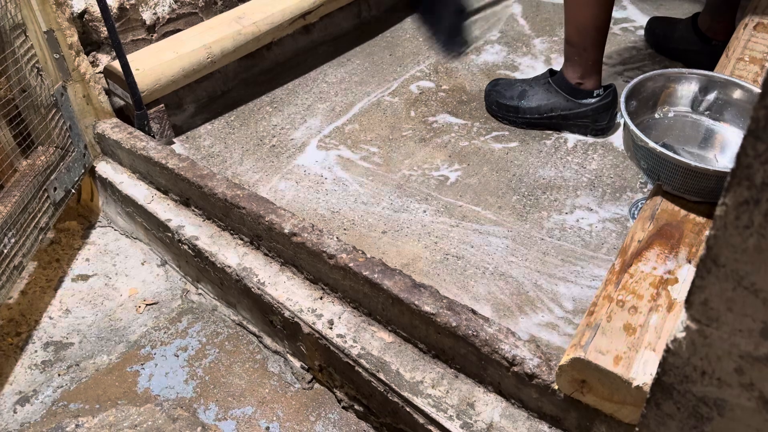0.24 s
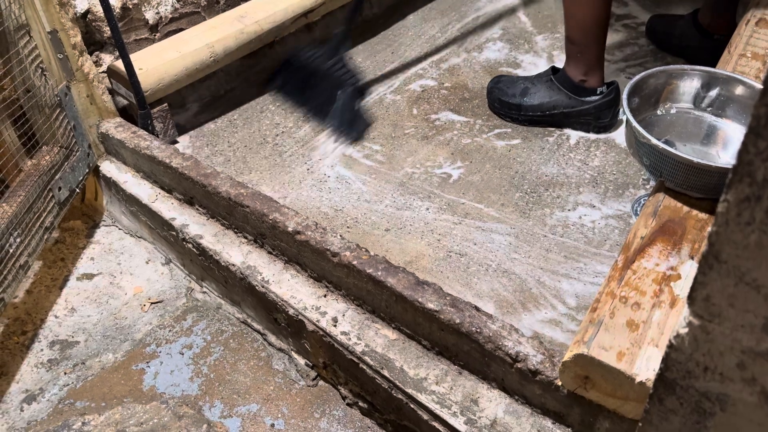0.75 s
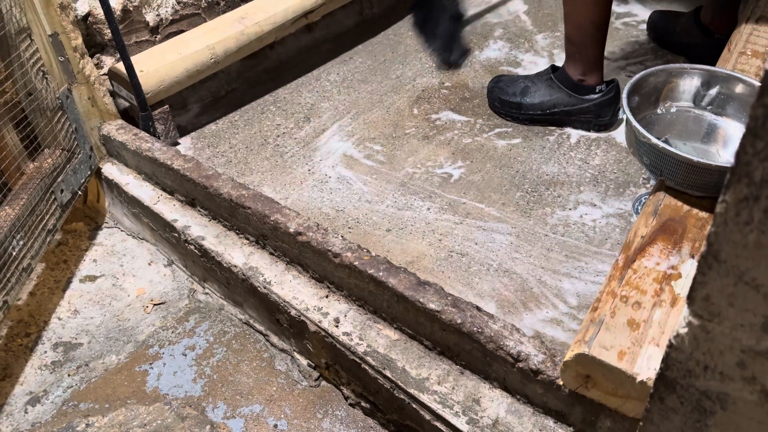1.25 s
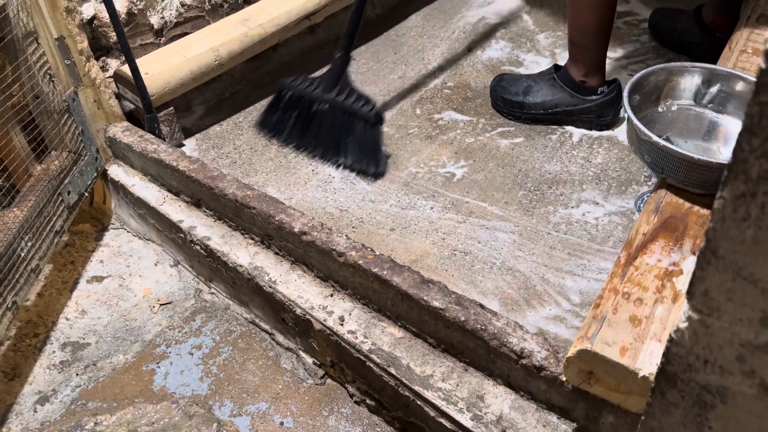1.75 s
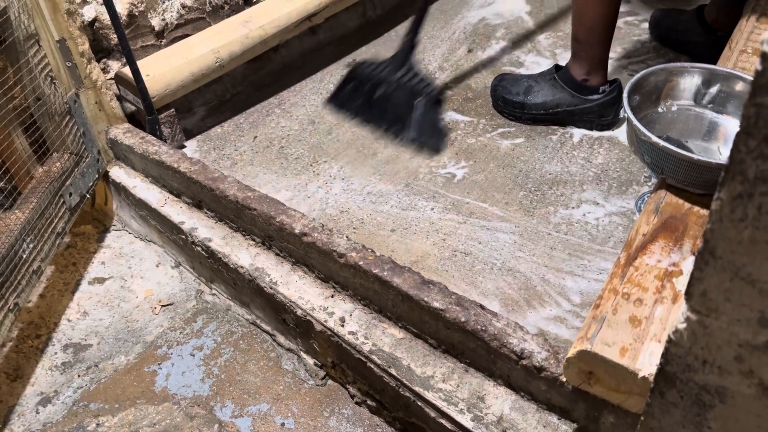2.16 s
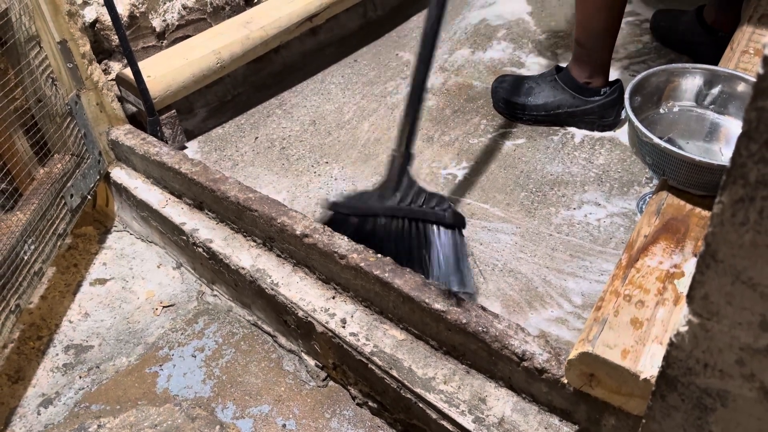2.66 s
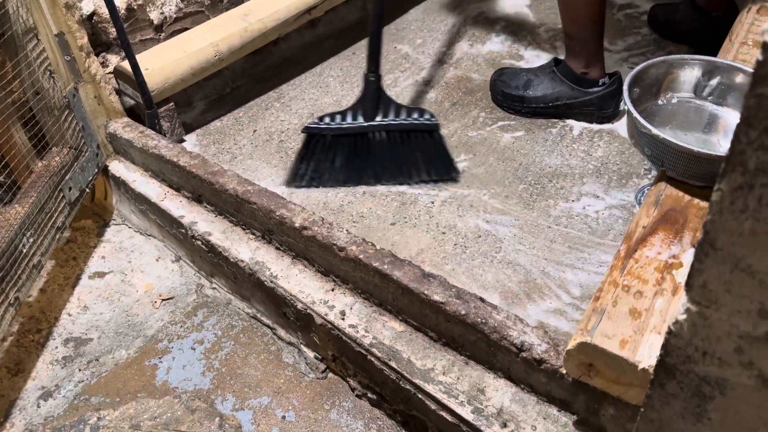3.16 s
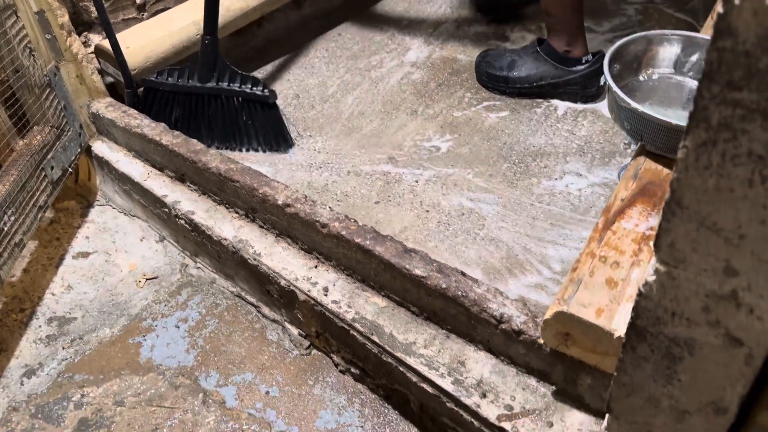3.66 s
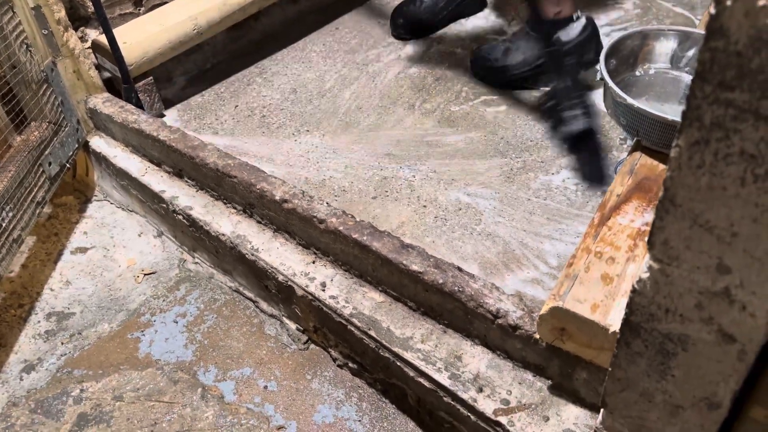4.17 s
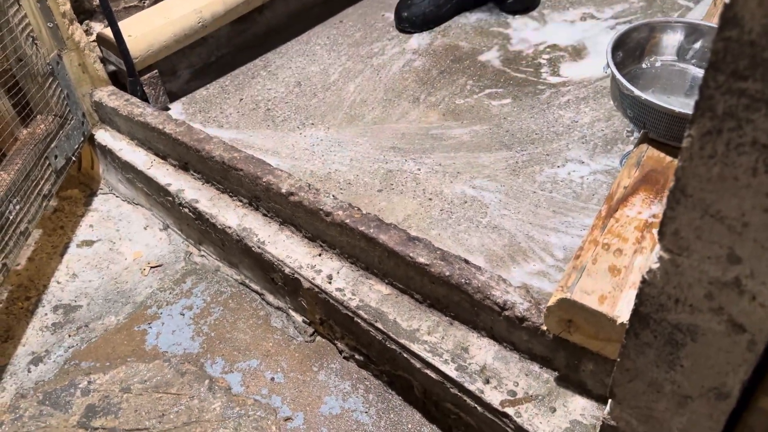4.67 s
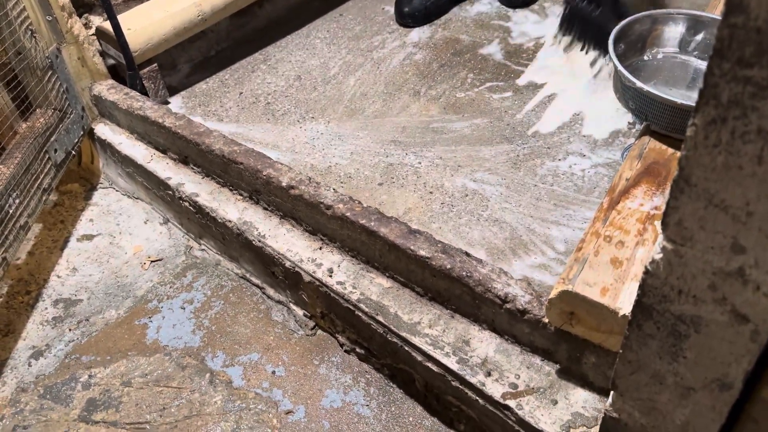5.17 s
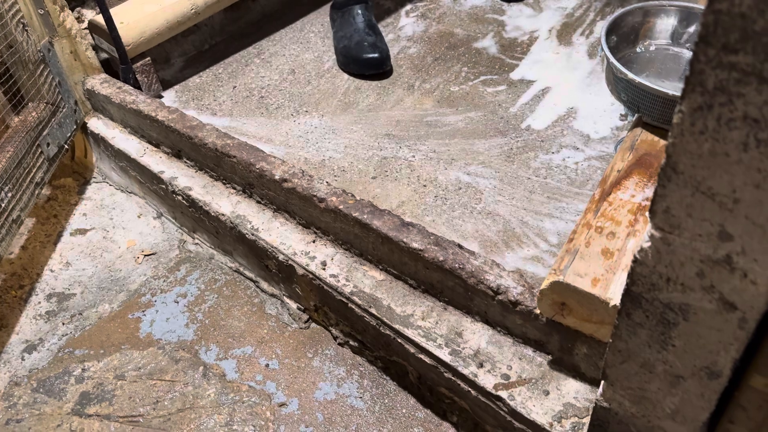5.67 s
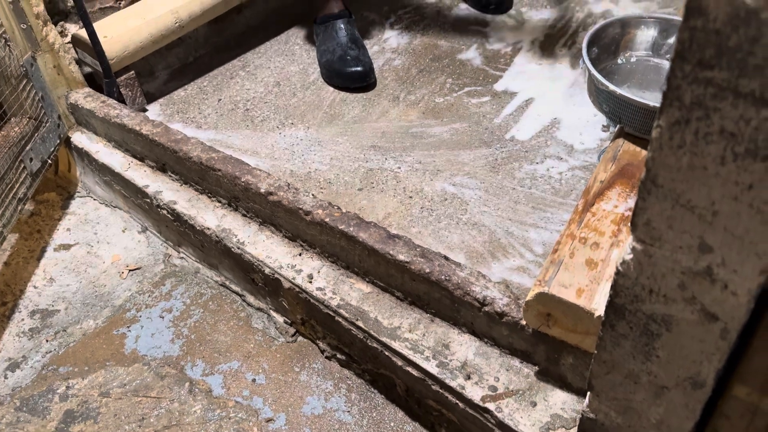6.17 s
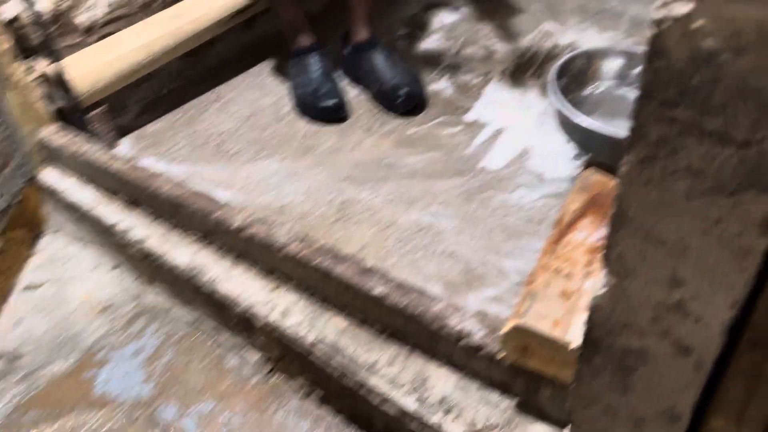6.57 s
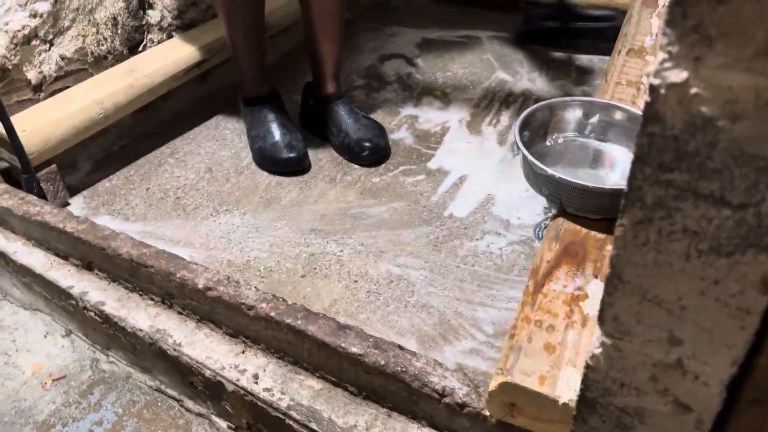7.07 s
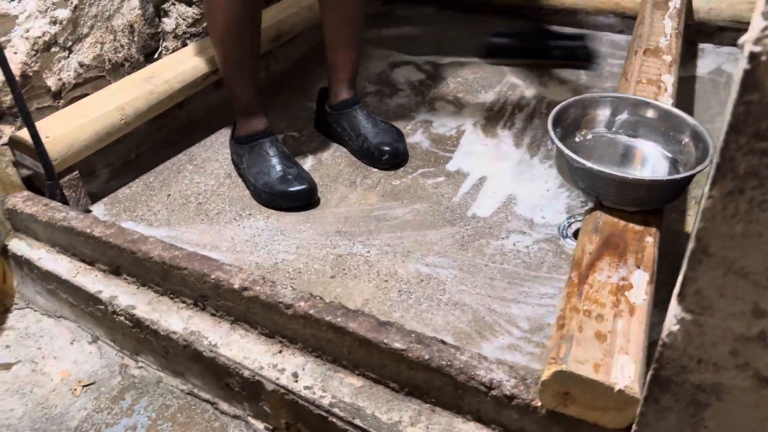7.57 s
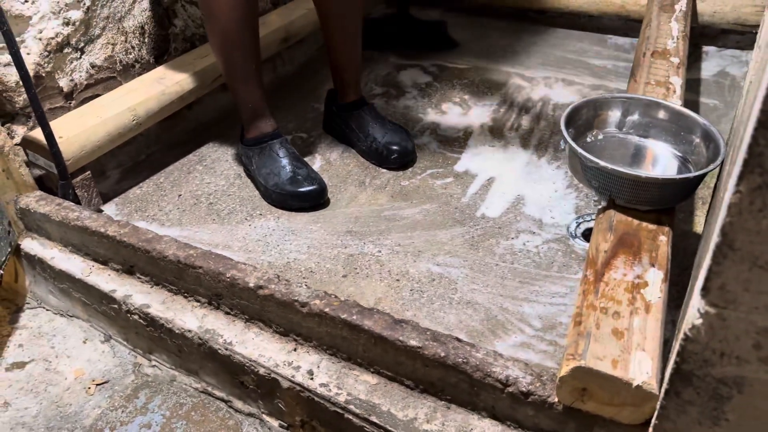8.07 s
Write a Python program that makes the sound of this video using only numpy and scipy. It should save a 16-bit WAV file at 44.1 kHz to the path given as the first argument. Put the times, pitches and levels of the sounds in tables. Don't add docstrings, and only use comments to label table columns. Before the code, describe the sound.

Brisk, bristly scrubbing on a sudsy floor, with sloshing water, hollow wood knocks growing busier later, and a tiny drain gulp near the end.

```python
import sys
import numpy as np
from scipy import signal
from scipy.fft import rfft, irfft, next_fast_len
from scipy.io import wavfile

SR = 44100
rng = np.random.default_rng(int(sys.argv[2]) if len(sys.argv) > 2 else 0)


def to_wav(sig):
    pcm = np.clip(np.atleast_2d(sig), -1, 1) * 32767
    pcm = np.round(pcm).astype(np.int16)
    wavfile.write(sys.argv[1], SR, pcm.T)


def to_linear_factor(level_db):
    exponent = np.asarray(level_db, float) / 20
    return 10 ** exponent


N = 366912
HZ = np.maximum(np.fft.rfftfreq(N, 1 / SR), 1)
FAR_FROM_S = 4

# start in seconds, speeding up in seconds,
# slowing down in seconds, bristle hiss at full speed in dB, wetness as slosh in dB against the hiss.
STROKES = [(-0.19, 0.044, 0.31, -32, 0.5), (0.064, 0.28, 0.44, -18.5, -10.5),
           (0.51, 0.035, 0.046, -33.5, -2.5), (0.535, 0.36, 0.22, -19.5, -5.5),
           (0.927, 0.083, 0.098, -26, -5), (1.097, 0.16, 0.54, -19, -12.5),
           (1.324, 0.054, 0.03, -25.6, -15), (1.349, 0.44, 0.14, -27.5, -13.5),
           (1.55, 0.035, 0.089, -28.5, -10), (1.948, 0.076, 0.11, -45.5, -28),
           (2.036, 0.087, 0.17, -23, -6.5), (2.15, 0.075, 0.2, -20.5, -5.5),
           (2.398, 0.17, 0.3, -26, -13), (2.445, 0.014, 0.053, -33.5, -6),
           (2.616, 0.046, 0.1, -32, -2), (2.618, 0.2, 0.26, -30.5, -7), (3.041, 0.11, 0.33, -32, -6),
           (3.191, 0.34, 0.13, -27, -10), (3.352, 0.068, 0.092, -35, -15),
           (3.685, 0.21, 0.89, -25, -11), (3.939, 0.27, 0.38, -24.5, -11.5),
           (3.945, 0.12, 0.23, -23, -9), (4.18, 0.13, 0.072, -31.5, -3.5),
           (4.32, 0.088, 0.38, -24, -13.5), (4.672, 0.32, 0.26, -25, -4.5), (4.9, 0.13, 0.14, -37, 3.5),
               (5.127, 0.26, 0.2, -25.5, -13), (5.182, 0.1, 0.22, -20, -11), (5.374, 0.046, 0.13, -32, -3),
               (5.546, 0.25, 0.2, -25.5, -5), (5.947, 0.26, 0.083, -30, -21),
               (6.031, 0.044, 0.061, -30, -6), (6.075, 0.15, 0.2, -28, -4.5), (6.21, 0.18, 0.21, -34.5, -4),
               (6.504, 0.21, 0.35, -30, -3), (6.758, 0.12, 0.094, -27.5, -8.5),
               (6.963, 0.23, 0.21, -22.5, -8.5), (7.235, 0.069, 0.11, -27.5, -8.5),
               (7.337, 0.19, 0.41, -23.5, -4), (7.57, 0.054, 0.18, -29.5, -14),
               (7.752, 0.23, 0.24, -19.5, -9), (7.99, 0.056, 0.03, -27, -12), (8.102, 0.23, 0.063, -23, -4)]
# level in dB against the hiss, dB gained per dB of wetness,
# power of the speed, dB gained along a stroke, level at rest in dB.
LAYERS = [
    (-11.5, 1.62, 1.8, 0, -54.5),
    (-1.96, 1.62, 1.94, 2, -68),
    (-1.56, 1.03, 1.83, 3.5, -59.5),
    (-0.04, 0.0034, 2.02, 3.5, -52),
    (-11, -0.44, 1.94, -0.5, -64),
]
LAYER_EDGES_HZ = [1093, 1943, 3316, 9150]
# time in seconds, lift in dB.
SUDS = [(0.0, -1), (.9, -0.5), (1.3, -5.5), (1.9, 4), (2.2, -3), (2.62, 3), (3.0, -1.5), (4.0, -1.7),
        (4.35, 1), (5.0, 2.5), (5.6, -0.5), (6.1, 2), (6.4, -1), (6.8, 2.5), (7.3, -1), (8.32, 0)]
# lightest moment in seconds,
# lifting in seconds, settling in seconds, loss in dB (below 0 is a last press).
HOPS = [
    (.49, 0.016, 0.092, 4.5),
    (.595, 0.031, 0.021, 9),
    (1.09, 0.02, 0.021, -7),
    (1.93, 0.04, 0.033, -11),
    (2.052, 0.034, 0.0059, 7),
    (2.4505, 0.018, .003, 6),
    (5.2, 0.02, 0.013, 0),
    (5.997, 0.023, .002, 5),
    (6.045, 0.02, .006, -1),
    (7.78, 0.028, 0.016, 7),
]
# pitch in Hz, left level in dB, right level in dB,
# likeness of the ports from 0 to 1.
PORTS = [(238, -30.5, -28.5, 1), (600, -20, -18.5, 0.39), (1150, -12.5, -12, 0.54), (1400, -10, -8, 0.6),
         (3240, -3.5, -4, 0.24), (4650, 5.5, -2, 0.3), (5250, 2.5, -1, 0.2), (6050, 6.5, -.5, 0.35),
         (6600, 4.5, -1, 0.3), (7500, 4, .5, 0.4), (8700, 0.5, 3.5, 0.64), (9400, -.5, 0, .99),
         (10000, -3, -3, 0.99), (10300, -5, -5, 0.98), (16000, -3.5, -5, 0.91)]
# time in seconds, left over right in dB.
BROOM_SIDE = [(0.0, 5), (1.27, 4), (1.81, 5), (2.8, 4), (3.89, 4.5), (4.9, 5), (6.19, 6), (6.6, 5.5),
              (7.34, 5), (7.44, 4), (7.67, 4.5), (8.32, 3.5)]
# time in seconds,
# duration in seconds, pitch in Hz, width in octaves, change in dB.
BAND_SWELLS = [(0.15, 0.061, 2400, 1.5, 4), (.47, 0.17, 2560, 1.9, -4.5), (.47, 0.079, 850, 0.65, 6),
               (.65, 0.043, 5100, 2.2, 4.5), (0.657, 0.052, 1103, 0.55, 1), (0.777, 0.09, 3100, 0.3, -1),
               (0.994, 0.13, 1700, 0.55, 3), (1.3, .12, 4240, .4, 2), (1.805, 0.16, 1460, 2.04, 7.5),
               (1.868, 0.037, 2810, 2.5, 8.5), (2.05, .04, 2300, 1.1, -9), (2.238, 0.057, 1600, .9, 1.5),
               (2.4, 0.092, 2300, .4, -3), (2.562, 0.068, 1190, 1.5, 11), (2.785, 0.054, 2440, 0.63, 6.5),
               (2.832, .07, 850, .5, 6.5), (3.035, .05, 1100, 1, -9), (3.4, .2, 900, 0.91, 4),
               (3.777, .08, 1280, .5, 4), (3.85, 0.071, 3020, .3, -1), (4.15, .2, 1310, 0.29, -6.5),
               (4.3, .08, 4330, .6, -1.5), (4.604, 0.074, 1480, 1.25, 12), (4.75, .04, 1200, 1.3, -6),
               (4.953, 0.054, 1900, .5, -1), (5.027, 0.033, 1550, 0.26, 5.5), (5.117, 0.095, 960, 0.65, 6.5),
               (5.143, .04, 5000, 1.1, -1), (5.297, 0.12, 2000, .5, -3.5), (5.517, 0.086, 5000, 1.2, -1.5),
               (5.947, .12, 2300, 0.77, -0.5), (6.392, 0.087, 845, .4, 9), (6.55, 0.07, 1310, 0.33, 6),
               (6.794, 0.062, 1400, 1.4, -5), (7.0, 0.098, 1600, 1.5, 5), (7.253, 0.12, 907, 0.49, -8),
               (7.5, 0.17, 1900, 0.46, -1), (7.7, 0.087, 850, 0.37, 6.5), (7.85, 0.056, 2300, 0.62, 2),
               (8.24, 0.074, 4280, 0.32, 4),
               (1.912, 0.072, 9200, 1.89, 10), (1.95, 0.063, 880, 0.68, -18), (3.02, .06, 710, .6, -12),
            (3.62, 0.025, 2100, 1.5, 3), (3.72, 0.024, 3300, 1.4, -2), (8.28, 0.042, 1800, .5, 1.5),
            (5.75, 0.045, 2500, 0.7, 1.5), (5.85, 0.049, 1500, .8, -2), (4.87, .04, 2800, .4, 4),
            (4.2, 0.1, 5800, 0.55, -2), (0.86, 0.09, 4300, .4, 2), (0.33, .1, 4200, .4, 1),
            (6.9, 0.051, 1240, .4, 6), (2.02, 0.066, 3000, .3, -2), (4.43, .04, 2950, .2, 1),
            (0.526, .04, 960, 0.89, 9), (0.86, 0.12, 560, 0.45, -7), (6.2, .1, 640, .5, 3),
            (1.5, 0.22, 1100, .3, 5), (4.3, .04, 1060, 0.22, 11), (7.5, .03, 1600, 0.18, 3.5),
            (7.08, .03, 1950, .2, 7), (4.06, .05, 4400, .2, 4.5), (6.2, 0.072, 6000, 0.88, 2),
            (0.47, .05, 380, .7, 10), (2.22, 0.053, 2200, .4, 1.5), (8.2, 0.055, 4200, .25, 3),
            (7.55, 0.045, 1400, 0.62, 5), (.675, .015, 1430, .2, 11), (3.635, .03, 1500, .9, 10),
            (4.1, .03, 3500, 1.2, -4), (3.71, 0.023, 5200, 1, 3), (0.99, .05, 1500, .4, 2),
            (8.3, 0.027, 1380, 0.21, 9.5), (2.22, .06, 3000, .5, 1.5), (1.12, .03, 1000, 1.5, -5),
            (5.33, 0.037, 6800, 0.82, 2), (0.91, .03, 1400, .25, 4), (7.42, .03, 3300, 1, 4.5)]
# pitch in Hz, level in dB per Hz.
RUMBLE = [(15, -38), (25, -46), (46, -10), (64, 9), (295, -0.5), (444, -0.5), (501, 5), (626, -25),
          (1010, -5.5), (1200, -27), (1500, -3.5), (1950, -2), (3300, -120)]
# time in seconds, level in dB.
JOLTS = [(0.0, -40), (.2, -47), (.53, -48), (2.9, -54), (3.15, -46), (3.61, -46), (4.61, -49), (5.21, -69),
         (5.44, -48), (5.93, -63), (6.21, -53), (6.93, -59), (7.39, -50), (7.71, -52), (8.0, -62)]
# time in seconds, peak in dB.
SCUFFS = [(.001, -25), (.03, -28.5), (.12, -30), (.5, -26), (3.85, -33), (6.6, -36), (.8, -25),
          (1.044, -30), (1.912, -31), (2.2, -33), (2.47, -31), (2.545, -29), (2.652, -27.5), (4.3, -34),
          (6.06, -29), (7.31, -21.5), (7.75, -25)]
# time in seconds, peak in dB, thud pitch in Hz,
# ring in dB against the thud, lowest mode in dB against the thud.
NEAR_KNOCKS = [
    (0.002, -25, 486, -7, -7),
    (0.029, -30.5, 425, 0, -18),
    (0.4995, -18.5, 1350, -2, -30),
    (0.534, -34, 447, 0, -18),
    (2.632, -21, 1190, -4, -25),
    (3.558, -14, 530, -2, -20),
    (3.563, -4.5, 398, -12, -28),
]
FAR_KNOCKS = [(4.574, -30.5, 564, -3, -13), (4.625, -23, 384, -2, -21), (4.652, -23.5, 520, -16, -17),
              (5.434, -25.5, 530, 3, -2.5), (5.467, -23, 389.4, -1.5, -13), (5.498, -30, 418, -15, -19),
              (5.598, -42.5, 1150, -1, 5), (5.996, -41, 322, 10, -14), (6.19, -18.5, 364, 2, -13),
              (6.209, -14.5, 500, -8, -30), (6.244, -25, 590, 1, -23), (6.3, -31, 270, 3, -16),
              (6.3477, -19, 627, 2, -17), (6.365, -28, 374, -16, -21), (6.449, -36, 334, 7.5, -1),
              (6.8905, -8.5, 620, -3.5, -22), (6.902, -13.5, 640, -7, -9), (6.929, -12.5, 443, -17, -10),
              (6.954, -23.5, 637, 4, -20), (7.303, -19.5, 387, -8, -16), (7.727, -28, 287, 3.5, 0),
              (7.744, -23.5, 428.8, -7, -21)]
MORE_KNOCKS = [
    (.501, -29.5, 390, -9, -24),
    (.522, -20, 1270, -2, -29),
    (3.569, -18, 1400, -4, -28),
]
# pitch in Hz, level in dB, share of the ring time (ratio).
NEAR_RAIL = [(334, -13, 1.3), (376, -1, 1.1), (449, -10, 1.15), (507, -6, 1), (628, -33, 0.32),
             (734, -5, 0.82), (839, -5, 1.2), (1000, -26, 0.98), (1130, 3, 0.47), (1430, -7, 0.73)]
FAR_RAIL = [(223.5, 3.5, 0.66), (283, -8, 0.94), (342.4, -2.5, 1.22), (389.4, -2.5, 0.66), (458, -4, 1.36),
            (542, -7, 1.2), (642, -7.5, 0.94), (694, -10.5, 1.1), (770, -1.5, 0.46), (970, 0.5, 0.63)]
# time in seconds, peak in dB, top of the sound in Hz.
SLAPS = [
    (2.07, -15, 15000),
    (2.455, -10, 8500),
    (5.189, -21, 15000),
    (5.999, -17.5, 9500),
    (.115, -32, 15000),
    (4.635, -29, 15000),
    (6.04, -24, 15000),
]
# deepest moment in seconds, peak in dB, pitch in Hz,
# length in cycles.
PUNCHES = [(.503, -29, 800, 1.5), (.527, -33, 750, 1.5), (4.6295, -19.5, 500, 1.4), (4.661, -31, 500, 2.5),
           (5.4735, -21, 493, 0.97), (6.352, -22, 680, 1.3), (6.3465, -24, 750, 1.5),
           (6.206, -25, 460, 1.6), (4.6255, -27, 480, 1.1), (6.1955, -17, 420, 1.2), (6.225, -22, 520, 2.6),
           (6.243, -26, 600, 1.3), (6.8935, -13, 650, 0.9), (6.9045, -12, 520, 1.2), (7.304, -27, 600, 1.3),
           (7.772, -28, 350, 1.3), (6.44, -29, 600, 1.7)]
# time in seconds, pitch in Hz, level in dB,
# ring time in seconds (to -60 dB), lag of the left port in radians.
AFTERRINGS = [(3.57, 377, -22.5, 0.24, -.7), (3.57, 334, -28.5, 0.33, 1), (3.575, 452, -27, 0.24, -.6),
              (3.57, 716, -33, 0.21, -.6), (4.655, 522, -34, 0.21, .6), (5.47, 600, -30, .1, 0),
              (6.2, 480, -26, 0.16, .3), (6.352, 382, -29, 0.15, 0.56), (6.352, 720, -34, 0.22, .3),
              (6.9, 452, -24, 0.28, 0.91), (6.895, 641, -21.5, 0.28, 1.9), (6.93, 590, -31, 0.21, -1),
              (6.895, 996, -24.5, 0.12, 1.3), (6.9, 340, -24, .27, .7), (7.305, 380, -26, 0.12, 0.3),
              (7.745, 460, -35, 0.18, 0.087), (4.624, 570, -27.5, 0.086, 0)]
# time in seconds, pitch in Hz, level in dB.
GULP = [
    (8.095, 1004, -60),
    (8.104, 1020, -41),
    (8.12, 1070, -39),
    (8.14, 1250, -39),
    (8.155, 1330, -38),
    (8.17, 1420, -45),
    (8.192, 1620, -46),
    (8.2, 1680, -58),
]
BLOWS = NEAR_KNOCKS + FAR_KNOCKS + MORE_KNOCKS


def rms_one(x):
    return x / np.sqrt(np.mean(x ** 2) + 1e-20)


def columns(rows, at, warp=np.asarray):
    first, *rest = np.transpose(rows)
    return [np.interp(warp(at), warp(first), column) for column in rest]


def drift(rate_hz):
    r = np.exp(-80 * np.pi * rate_hz / SR)
    slow = signal.lfilter([1], [1, -2 * r, r * r], rng.standard_normal(N // 40 + 2002))[2000:]
    return np.interp(np.arange(N) / 40, np.arange(len(slow)), rms_one(slow))


def stroke_levels():
    braking = 1.76
    mean_wet_db, wet_drift = -7, 0.3
    t = np.arange(0, N + 64, 64) / SR
    start, rise, fall, hiss_db, wet_db = np.transpose(STROKES)[:, :, None]
    rising = t < start + rise
    swing = np.where(rising, (t - start) / rise, 1 - (t - start - rise) / fall)
    speed = np.sin(np.pi / 2 * np.clip(swing, 0, 1)) ** np.where(rising, 1, braking)
    along = np.clip((t - start) / (rise + fall), 0, 1) - .5
    wet_db = wet_db + wet_drift * (wet_db - mean_wet_db) * along
    gains = []
    for rel_db, follow, power, gain_db, rest_db in LAYERS:
        strokes = to_linear_factor(hiss_db + rel_db + follow * wet_db + gain_db * along) * speed ** power
        gains.append(np.sqrt(np.sum(strokes ** 2, axis=0) + to_linear_factor(rest_db) ** 2))
    gains[-1] = gains[-1] * to_linear_factor(columns(SUDS, t)[0])
    lost_db = 0
    for s, lift, settle, db in HOPS:
        lost_db = lost_db + db * np.exp(-((t - s) / np.where(t < s, lift, settle)) ** 2)
    return [np.interp(np.arange(N) / SR, t, gain * to_linear_factor(-lost_db)) for gain in gains]


def snaps(spread_db):
    return rms_one(rng.standard_normal(N) * to_linear_factor(spread_db * np.minimum(rng.exponential(1, N), 5)))


def pockets(excite):
    out = 0
    for hz in np.geomspace(1350, 7500, 26):
        r = np.exp(-np.pi * .03 * hz / SR)
        ring = signal.lfilter([1, 0, -1], [1, -2 * r * np.cos(2 * np.pi * hz / SR), r * r], excite)
        out = out + rms_one(ring) * to_linear_factor(7 * np.tanh(.7 * drift(6)))
    return rms_one(out)


def bristles():
    turn_hz, aligned_hz = 2900, 11250
    pan_db, = columns(BROOM_SIDE, np.arange(N) / SR)
    left_db, right_db, alike = columns(PORTS, HZ, np.log)
    alike = np.clip(alike, 0, 1)
    right_db = np.where(HZ > 9200, left_db, right_db)
    waves = [snaps(spread_db=1.5) for _ in range(3)]
    common, own_left, own_right = [rfft(wave + 0.38 * pockets(wave)) for wave in waves]
    high_turn = 2 * np.pi * (HZ - aligned_hz) / turn_hz
    low_turn = -HZ / 3000 * np.exp(-(HZ / 4500) ** 4)
    turn = np.minimum(np.where(HZ > 7000, high_turn, low_turn), 3 * np.pi)
    lead = np.exp(1j * (turn - .25 * np.sin(2 * turn)))
    left = to_linear_factor(left_db) * (np.sqrt(alike) * common + np.sqrt(1 - alike) * own_left)
    right = to_linear_factor(right_db) * (np.sqrt(alike) * common * lead + np.sqrt(1 - alike) * own_right)
    below = [0] + [1 / (1 + (HZ / edge) ** 12.0) for edge in LAYER_EDGES_HZ] + [1]
    judder = 0.78 * drift(8.8) + 0.13 * drift(48)
    side = np.clip((pan_db - 5.5) / 2, -5, 5)
    flicker = [drift(10.4) for _ in range(4)]
    flicker.insert(1, flicker[1])
    out = 0
    for k, level in enumerate(stroke_levels()):
        layer = irfft(np.array([left, right]) * (below[k + 1] - below[k]), N)
        layer = layer / np.sqrt(np.mean(layer.mean(axis=0) ** 2))
        gain = level * to_linear_factor(judder + 1.12 * flicker[k])
        layer_side = side * (k < 4)
        out = out + layer * gain * to_linear_factor([layer_side, -layer_side])
    return out


def band_swelled(broom):
    out = broom.copy()
    for s, lasts, hz, octaves, db in BAND_SWELLS:
        a = max(round((s - 2 * lasts) * SR), 0)
        b = min(round((s + 2 * lasts) * SR), N)
        size = next_fast_len(b - a)
        band_hz = np.maximum(np.fft.rfftfreq(size, 1 / SR), 1)
        near = np.exp(-(2 * np.log2(band_hz / hz) / octaves) ** 2)
        band = irfft(rfft(out[:, a:b], size) * near, size)[:, :b - a]
        change_db = db * np.exp(-((np.arange(a, b) / SR - s) / lasts) ** 2)
        out[:, a:b] += band * (to_linear_factor(change_db) - 1)
    return out


def swayed(broom):
    sway_rad, mean_rad = .32, 0.18
    highs = rfft(broom[1]) / (1 + (8800 / HZ) ** 24) / (1 + (HZ / 14800) ** 60)
    turn = mean_rad + sway_rad * np.tanh(drift(4) + .8 * drift(14))
    change = (np.cos(turn) - 1) * irfft(highs, N) + np.sin(turn) * irfft(1j * highs, N)
    return np.array([broom[0], broom[1] + change])


def rumble():
    rise_s, fall_s, rest_db = 0.044, 0.084, -57.5
    bed_db, hum_hz, hum_width_hz, hum_db = -54.5, 61.5, 10, 0
    level_db, = columns(RUMBLE, HZ, np.log)
    swell = to_linear_factor(rest_db)
    for s, db in JOLTS:
        late = np.arange(N) / SR - s
        swell = swell + to_linear_factor(db - 5) * np.exp(-(late / np.where(late < 0, rise_s, fall_s)) ** 2)
    mid, side, hum = rfft(rng.standard_normal((3, N)))
    alike = (mid + 0.27 * side * [[1], [-1]]) * to_linear_factor(level_db)
    deep = 1 / (1 + (HZ / 170) ** 1.9)
    bed = to_linear_factor(bed_db - 3.0 + 1.1 * drift(10.0)) * rms_one(irfft(alike * (1 - deep), N))
    hum = rms_one(irfft(hum / (1 + ((HZ - hum_hz) / hum_width_hz) ** 2), N))
    return bed + swell * to_linear_factor(-1.0) * (rms_one(irfft(alike * deep, N)) + to_linear_factor(hum_db) * hum)


def crunch():
    level_db, t60_s, band_hz, rail_muffle_db = -10.5, 0.26, [200, 940], 8
    level, t = np.zeros(N + SR), np.arange(int(.3 * SR)) / SR
    hits = [(s, db - rail_muffle_db) for s, db, *_ in BLOWS]
    hits += [(s, db + 4.0) for s, db in SCUFFS]
    for s, peak_db in hits:
        i = round(s * SR)
        level[i:i + len(t)] += to_linear_factor(peak_db + level_db - 60 * t / t60_s) * (1 - np.exp(-t / 0.0012))
    dull = signal.butter(2, band_hz, "band", fs=SR, output="sos")
    mid, side = signal.sosfilt(dull, rng.standard_normal((2, N)))
    return level[:N] * rms_one(mid + 0.44 * side * [[1], [-1]])


def knocks():
    low_hz, low_t60_s, thud_cycles = 166, 0.27, 5.1
    near_t60_s, far_t60_s = 0.25, 0.22
    out = np.zeros((2, N))
    luck = rng.standard_normal((len(BLOWS), 4 * len(NEAR_RAIL)))
    t = np.arange(int(.5 * SR)) / SR
    for (s, peak_db, thud_hz, ring_db, low_db), row in zip(BLOWS, luck):
        far = s > FAR_FROM_S
        t60 = far_t60_s if far else near_t60_s
        hz, mode_db, share = np.transpose(FAR_RAIL if far else NEAR_RAIL)[:, :, None]
        strength, detune, skew, start = row.reshape(4, -1, 1)
        press = t * thud_hz / thud_cycles
        thud = np.sin(2 * np.pi * thud_hz * t) * np.exp(-press ** 3) * (1 - np.exp(-t / 0.0029))
        thud = thud + 0.35 * np.sin(2 * np.pi * 1.62 * thud_hz * t) * np.exp(-2.5 * press)
        low = to_linear_factor(low_db - 60 * t / low_t60_s) * np.sin(2 * np.pi * low_hz * t)
        low = low * (1 - np.exp(-t / 0.0075))
        near_db = mode_db - 4 * np.log2(hz / thud_hz) ** 2 + 2 * strength
        gain = to_linear_factor(near_db - 60 * t / (t60 * share))
        turn = 2 * np.pi * hz * (1 + .006 * detune) * t + .7 * start
        apart = 0.75 * skew * np.minimum(hz / 520, 1.5) ** 2
        ring = np.array([(gain * np.sin(turn + way * apart)).sum(axis=0) for way in (1, -1)])
        ring = ring * (1 - np.exp(-t / 0.0031))
        blow = thud / thud.max() + low + to_linear_factor(ring_db) * ring / np.abs(ring).max()
        i = round(s * SR)
        out[:, i:i + len(t)] += to_linear_factor(peak_db - 4.0) * blow[:, :N - i]
    return out


def pen(x):
    level_db, t60_s = -11, .3
    t = np.arange(int(.6 * SR)) / SR
    mid, side = rng.standard_normal((2, len(t))) * to_linear_factor(-60 * t / t60_s) * (t > .006)
    side = signal.sosfilt(signal.butter(1, 300, "high", fs=SR, output="sos"), side)
    echo = (mid + side * [[1], [-1]]) / np.sqrt(2 * np.sum(mid ** 2))
    return to_linear_factor(level_db) * signal.fftconvolve(x, echo, axes=1)[:, :N]


def slaps():
    out, t = np.zeros((2, N)), np.arange(2000) / SR
    for s, peak_db, top_hz in SLAPS:
        i = round(s * SR)
        burst = to_linear_factor(peak_db - 18.5 - 60 * t / 0.17) * rng.standard_normal((2, len(t)))
        band = signal.butter(2, [900, top_hz], "band", fs=SR, output="sos")
        out[:, i:i + len(t)] += signal.sosfilt(band, burst)
    return out


def punches():
    out, t = np.zeros((2, N + SR)), np.arange(-400, 400) / SR
    for s, peak_db, hz, cycles in PUNCHES:
        i = round(s * SR) - 400
        dip = to_linear_factor(peak_db) * np.cos(2 * np.pi * hz * t) * np.exp(-(2 * t * hz / cycles) ** 2)
        out[:, i:i + len(t)] -= dip
    return out[:, :N]


def afterrings():
    rise_s, damping = 0.0055, 1.5
    out, t = np.zeros((2, N + SR)), np.arange(SR // 2) / SR
    for s, hz, level_db, t60, lag in AFTERRINGS:
        i = round(s * SR)
        fade = to_linear_factor(level_db - 60 * (t / t60) ** damping) * (1 - np.exp(-(t / rise_s) ** 2))
        out[:, i:i + len(t)] += fade * np.sin(2 * np.pi * hz * t + lag * np.array([[-.5], [.5]]))
    return out[:, :N]


def gulp():
    t = np.arange(N) / SR
    hz, level_db = columns(GULP, t)
    sounding = (t > GULP[0][0]) & (t < GULP[-1][0])
    turn = 2 * np.pi * np.cumsum(hz) / SR + np.array([[.7], [-.7]])
    note = sounding * to_linear_factor(level_db + 5.0) * np.sin(turn)
    return note + to_linear_factor(-8) * np.roll(note, round(.018 * SR), axis=1)


def scene():
    blows = knocks() + punches() + afterrings() + gulp()
    broom = band_swelled(bristles())
    rest = slaps() + blows + pen(blows) + rumble() + to_linear_factor(-7.0) * crunch()
    return swayed(broom) + rest


def roll_off(x):
    return signal.sosfilt(signal.butter(12, 16000, fs=SR, output="sos"), x)


def record(dry):
    top = signal.cheby2(30, 60, 15930, fs=SR, output="sos")
    mix = signal.sosfilt(top, dry)
    return roll_off(mix)


dry = scene()
out = record(dry)
to_wav(out)
```